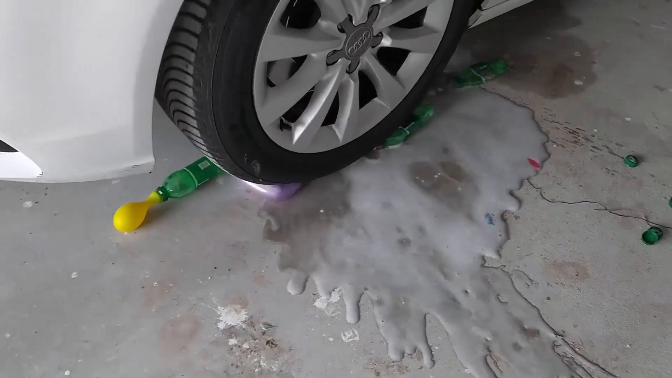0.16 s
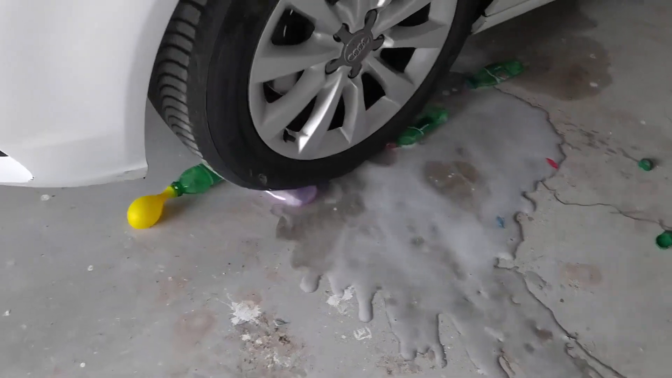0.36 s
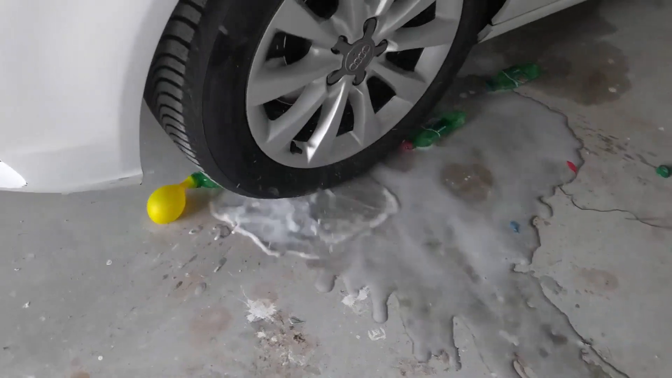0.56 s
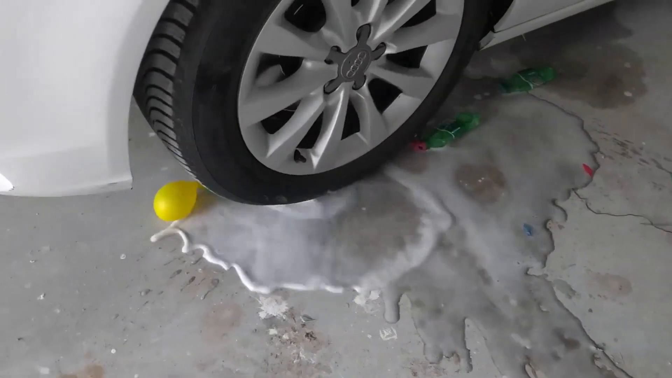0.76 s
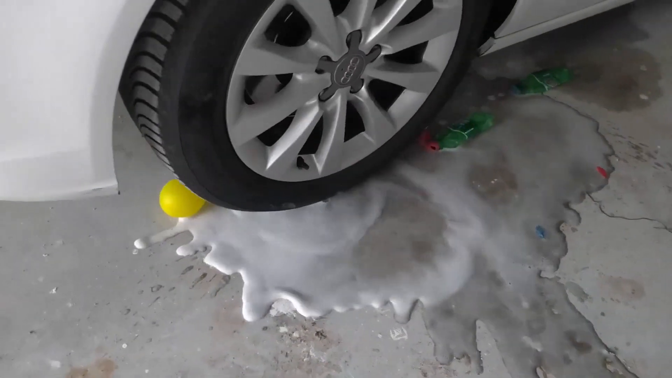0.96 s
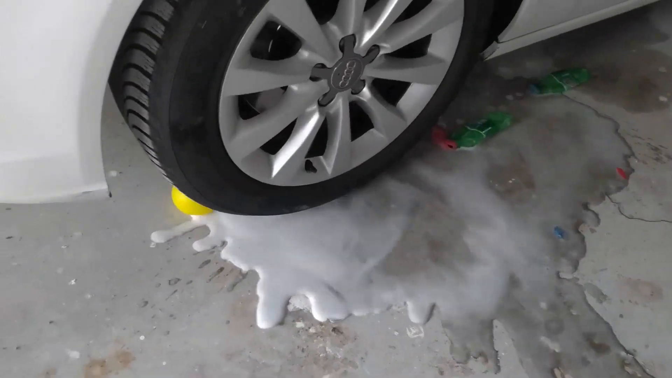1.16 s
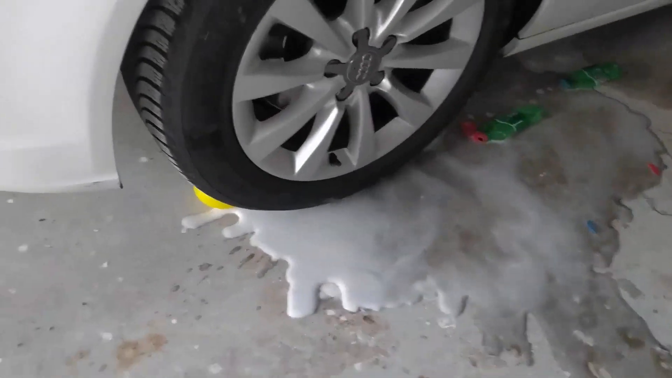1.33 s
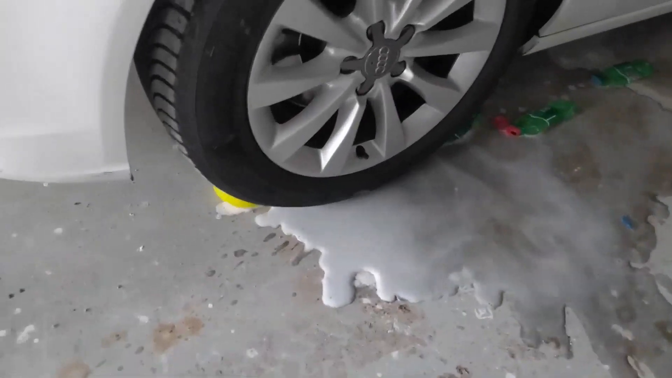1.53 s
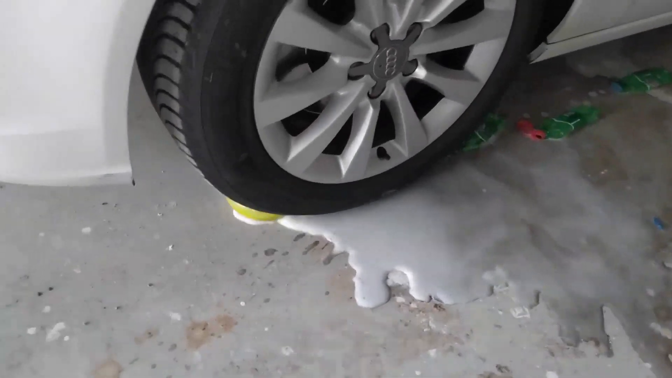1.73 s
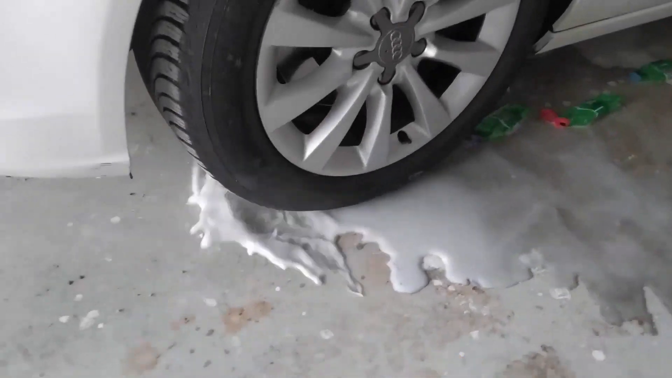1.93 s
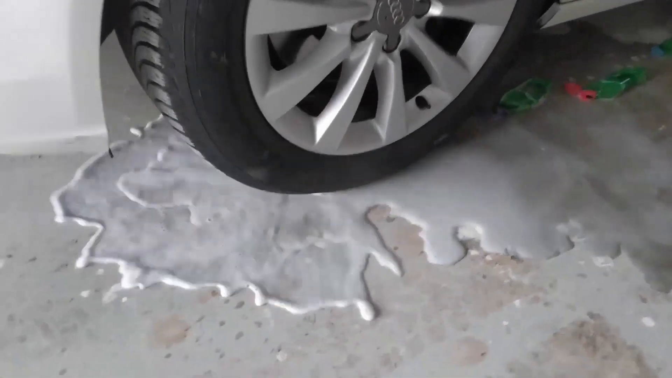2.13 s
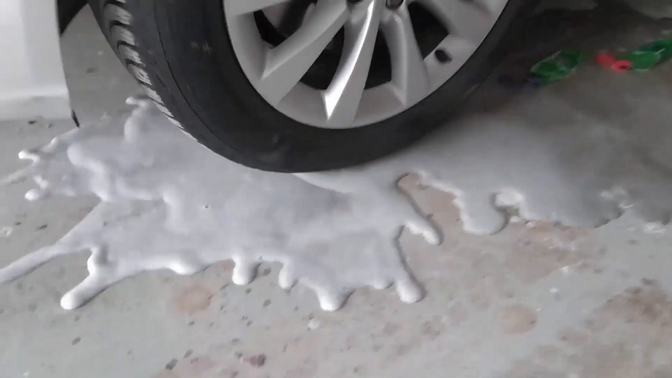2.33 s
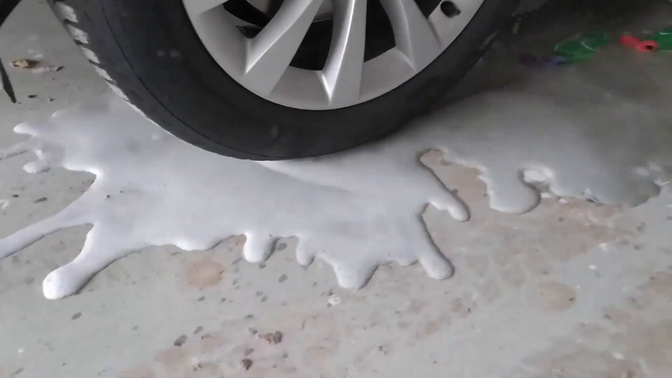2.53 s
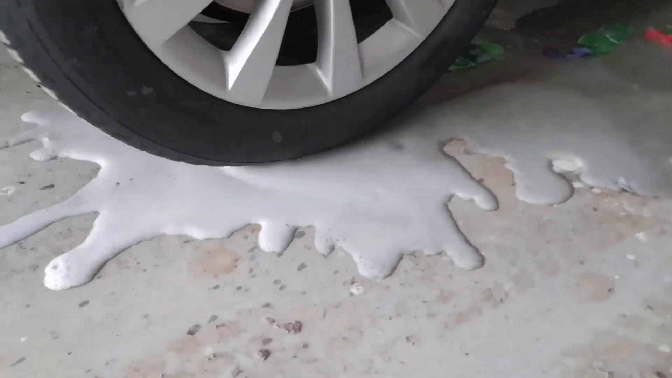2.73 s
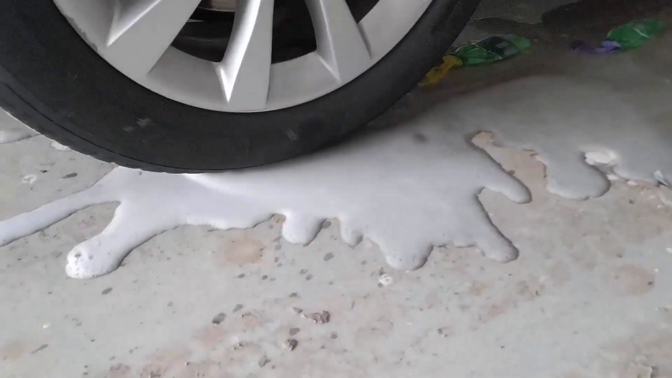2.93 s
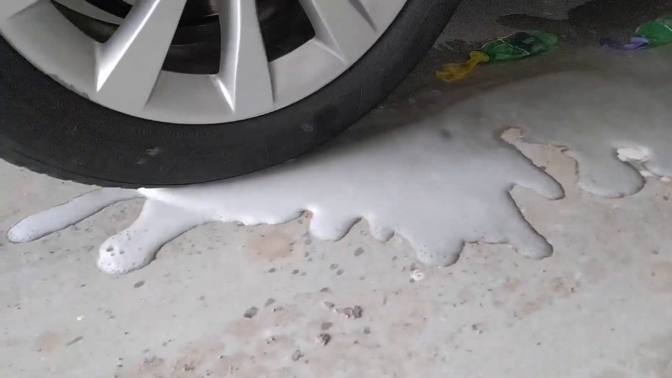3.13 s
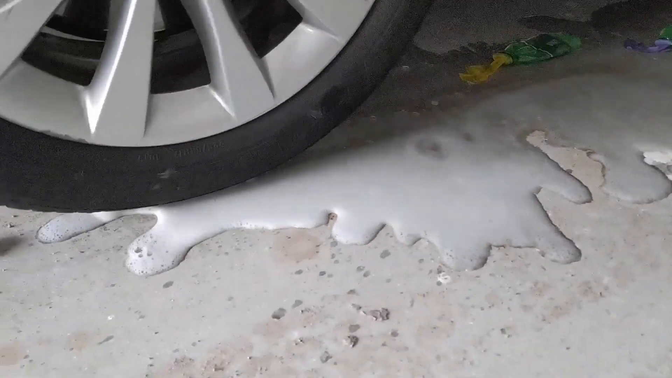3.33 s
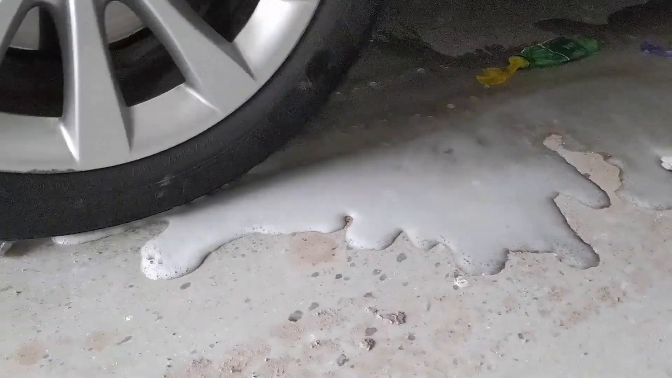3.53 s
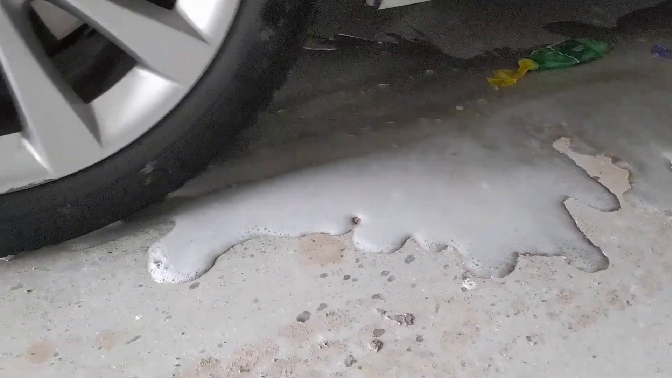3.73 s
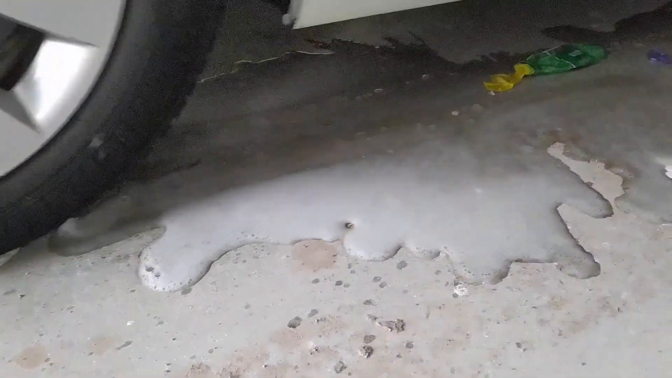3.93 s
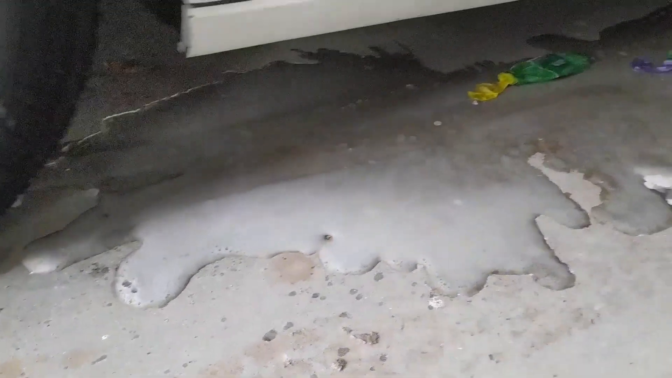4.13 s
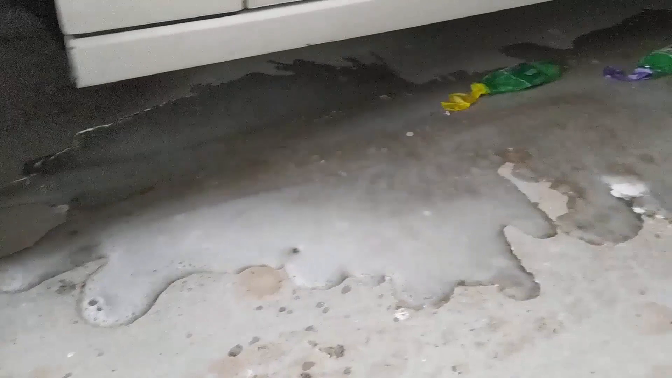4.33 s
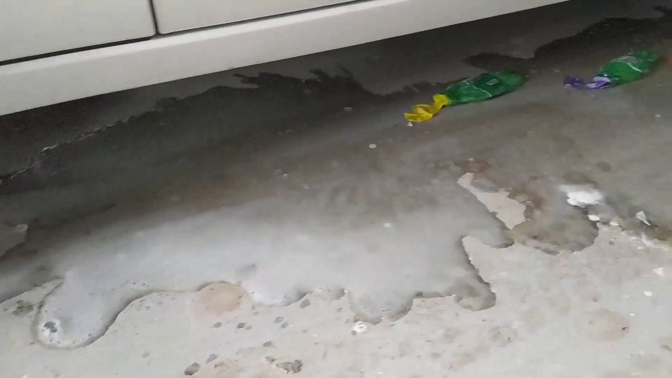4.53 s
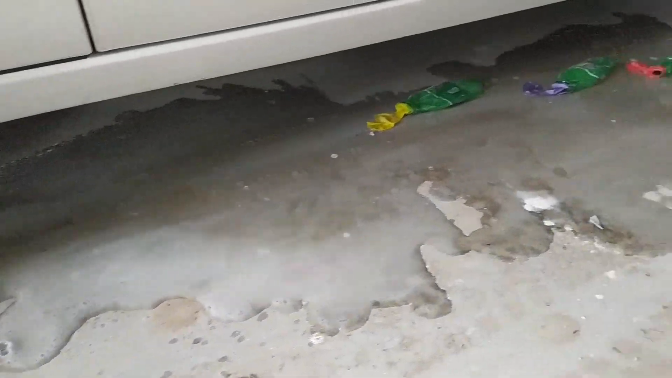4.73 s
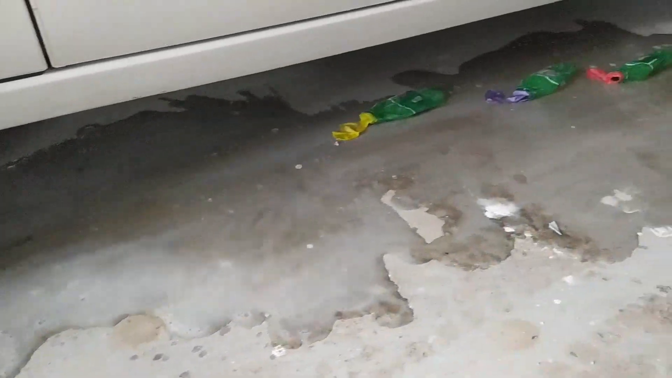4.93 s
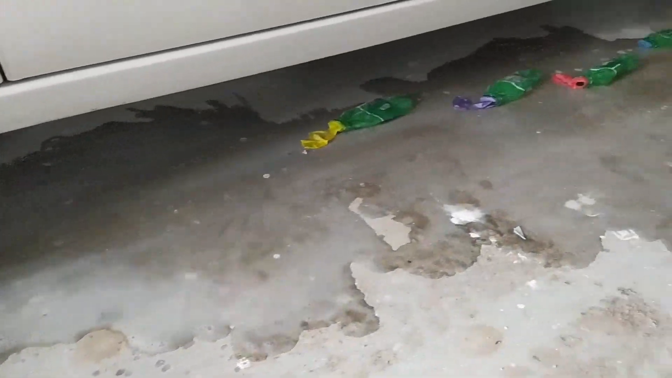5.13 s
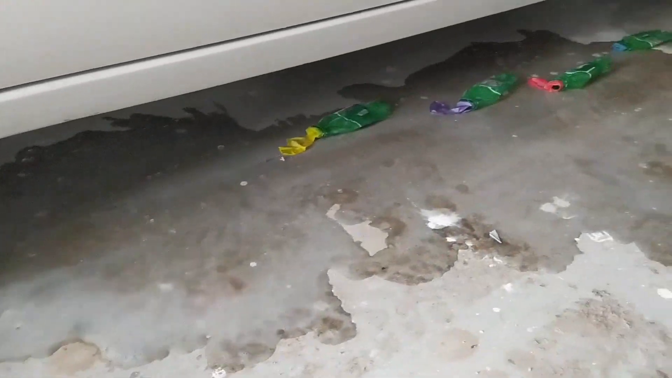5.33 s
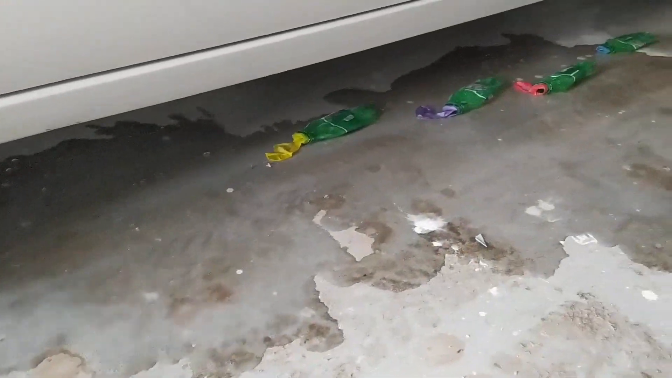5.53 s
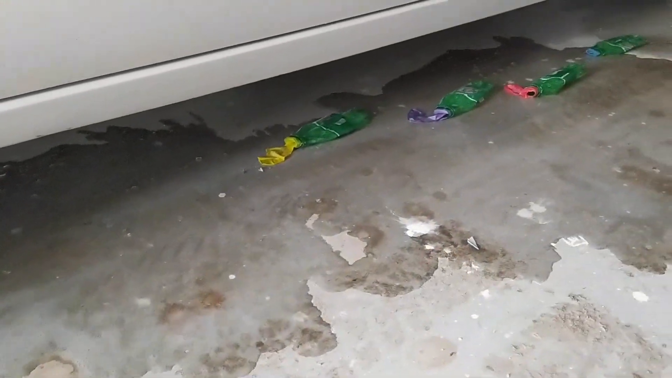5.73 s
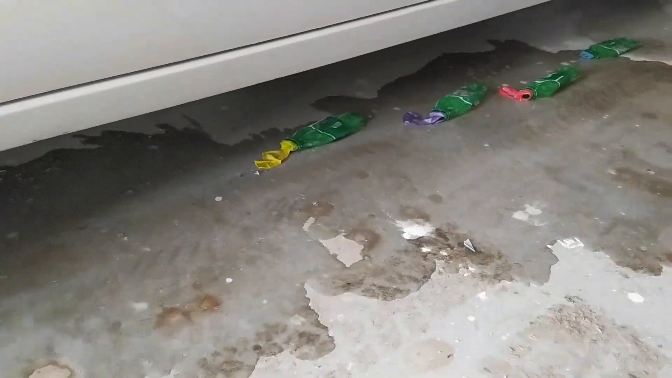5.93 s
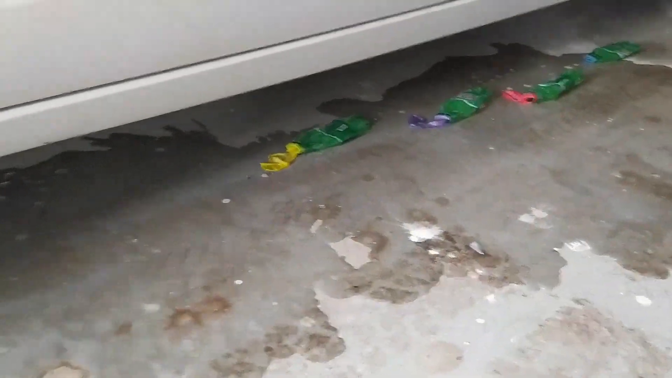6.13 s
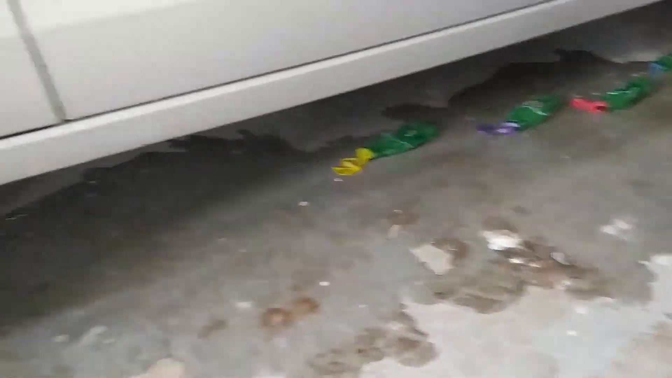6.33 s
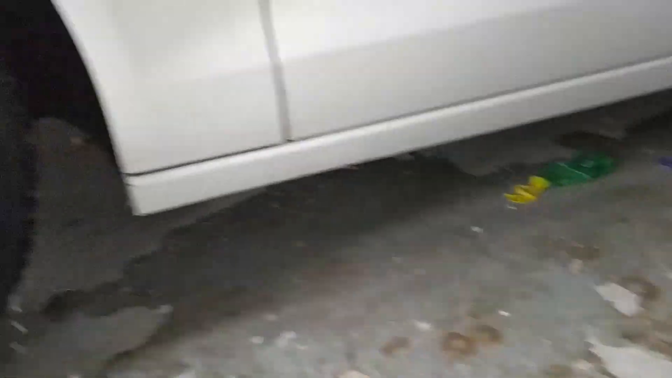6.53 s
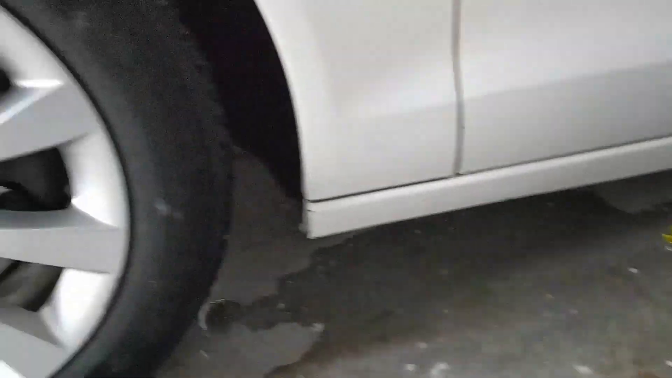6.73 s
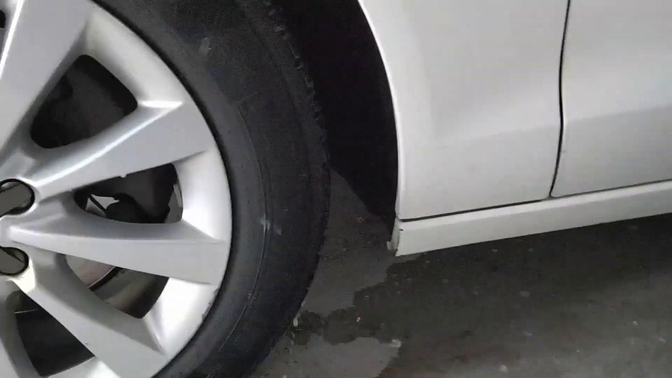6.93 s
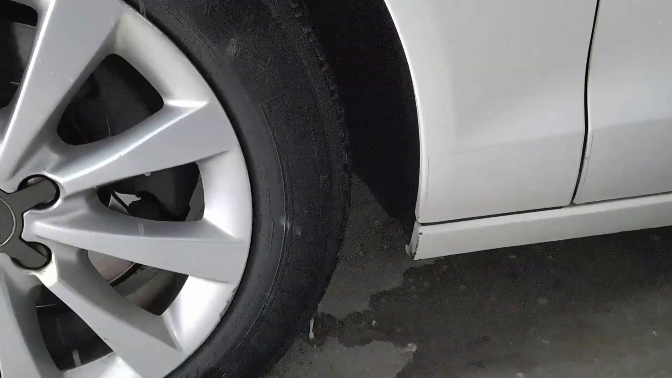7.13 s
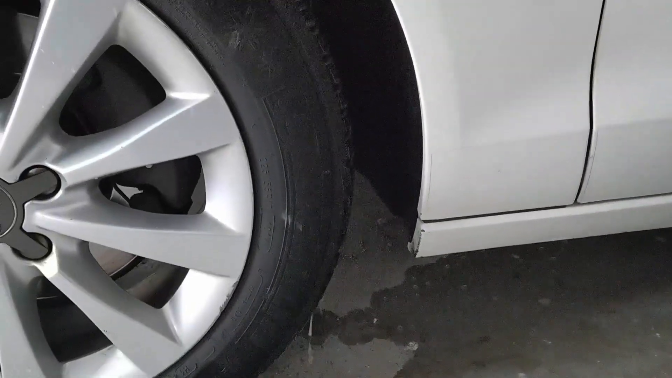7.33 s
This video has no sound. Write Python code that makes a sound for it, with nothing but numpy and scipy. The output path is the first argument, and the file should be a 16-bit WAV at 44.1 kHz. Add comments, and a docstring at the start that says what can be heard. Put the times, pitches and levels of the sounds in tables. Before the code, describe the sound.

In a concrete garage, the echo of an earlier bang fades as a car tyre rolls slowly over plastic bottles close to the microphone. The plastic crackles, then a bottle bursts with a loud, ringing bang and squirts foam. More crackling leads to a second bang and a wet splatter. Afterwards foam fizzes softly while the wet tyre rolls on with small gritty pops over a faint engine idle.

```python
"""First comes the hanging echo of a bang in a concrete garage, heard from a camera's two spaced microphones.
Close by, a car rolls slowly over plastic bottles of foam, capped with balloons. They crackle as they
buckle, and two burst with a bang that ducks the camera's gain; the echo swells back as the gain recovers.
Foam squirts out and fizzes on the floor while the wet tyre and the idling car move on."""
import sys
import numpy as np
from scipy import signal
from scipy.fft import rfft, irfft, next_fast_len
from scipy.io import wavfile
from scipy.ndimage import uniform_filter1d, map_coordinates

SR = 44100
rng = np.random.default_rng(int(sys.argv[2]) if len(sys.argv) > 2 else 0)


def inscribe(sig):
    """Save sig as 16-bit PCM at rate SR to the path in sys.argv[1].

    A 1-D sig is mono; a 2-D sig holds one channel per row.
    Samples are clipped to [-1, 1] before scaling.
    """
    pcm = np.round(np.clip(np.atleast_2d(sig).T, -1, 1) * 32767)
    wavfile.write(sys.argv[1], SR, pcm.astype(np.int16))


N = 329427

# Bottles bursting; of the first, only the echo is heard. Each row: start in seconds, levels of crack,
# slap, air push and echo in dB, pitch of the bottle's hollow in Hz, its boost in dB.
BOTTLE_BURSTS = [(-0.74, -4, -10, -20, -5.5, 380, 5), (0.6102, 0, -7, -17, -6.5, 1470, 8),
                 (1.9942, -1, -13.5, -17.5, -6, 500, 0.5)]
# The garage's decay. Each row: frequency in Hz, seconds to fall by 60 dB.
GARAGE_T60 = [(60, 2.2), (250, 2.055), (600, 1.77), (1000, 1.364), (2000, 1.58), (4000, 1.22), (9000, .6)]
# How strongly the tyre rolls. Each row: time in seconds, level in dB.
ROLL_LEVEL = [(3.5, 0.5), (4.55, 1), (5.7, -10), (6.6, -10.5), (7.47, -13)]
# Plastic buckling under the tyre. Each row: start in seconds, knock in Hz, knock in dB, crack in dB.
BUCKLES = [(0.015, 1240, -28, -45), (0.256, 1556, -24, -43.5), (0.424, 1120, -30, -33.5),
           (0.461, 970, -30, -31), (0.471, 3700, -20.5, -25), (0.506, 530, -21, -21.5),
           (1.135, 2180, -25, -24.5), (1.214, 905, -34.5, -30.5), (1.304, 905, -20, -42),
           (1.320, 1000, -25, -20.5), (1.336, 930, -19, -32), (1.361, 1190, -23.5, -20.5),
           (1.901, 1390, -23.5, -42), (2.368, 2310, -28, -22.5), (2.460, 3800, -21, -23.5),
           (3.208, 1430, -35.5, -44.5)]
# The modes of a bottle's wall. Each row: frequency in Hz, width in Hz, level in dB.
WALL_MODES = [(2290, 550, -0.5), (4500, 290, 0)]
# Hard bits under the tread. Each row: start in seconds, knock in dB, tick in dB.
CHIP_POPS = [(0.115, -44, -32), (0.369, -44, -28), (3.776, -28.5, -32.5), (3.817, -28, -39),
             (4.094, -29.5, -19.5), (4.165, -46, -35), (4.622, -48, -32), (4.999, -46, -38.5),
             (5.139, -46.5, -46.5), (7.087, -50.5, -60), (7.341, -62.5, -47)]
# Foam squirts as a bottle splits and again as it is flattened.
# Each row: time of full flow in seconds, hold in seconds, jet in dB, slop in dB.
FOAM_SQUIRTS = [(0.644, 0.088, -35, -39), (0.728, 0.016, -34, -23.5), (2.069, 0.09, -31.5, -30),
                (2.232, .03, -21, -23)]
# Creeping rubber. Each row: midpoint and length in seconds, resonance and its width in Hz, level in dB.
RUBBER_GROANS = [(3.763, .1, 394, 250, -49.5), (3.768, .22, 4830, 3000, -47), (3.963, 0.25, 302, 45, -54.5),
                 (3.99, 0.1, 156, 30, -51.5), (4.52, 0.27, 300, 500, -53), (4.655, 0.47, 159, 34.7, -58),
                 (4.652, 0.71, 89.3, 40, -59.5), (6.901, 0.63, 290, 111, -62.5),
                 (6.855, 0.43, 1870, 1300, -59.5)]

# Tone colours at the microphones. Each row: frequency in Hz, level in dB.
RIP_SPECTRUM = [(60, -26.5), (250, -8), (700, 1), (1200, 0), (1700, -9), (2600, -8.5), (3500, -22),
                (4400, -14), (5600, -20.5), (8500, -12), (11500, -25.5), (16000, -32.5)]  # a bottle bursting
ECHO_SPECTRUM = [(30, -23.5), (60, -29), (110, -28), (160, -19.5), (230, -8.5), (310, -11), (480, -3),
                 (780, 2), (1050, -4.5), (1450, -15), (2100, -12.5), (3200, -27.5), (4400, -24),
                 (6000, -26), (8500, -17.5), (12000, -36)]  # the garage's answer to it
FIZZ_SPECTRUM = [(1470, -43.5), (2500, -15.5), (3360, -12.5), (4210, -8), (5230, -13.5), (6150, -5),
                 (6860, -6.5), (8460, 2.5), (10000, -2), (11400, -14), (13900, -14.5), (15200, -21),
                 (16000, -23)]  # bubbles on the floor
RUMBLE_SPECTRUM = [(53, -29.5), (90, -7), (118, -5.5), (156, 2), (201, -3.5), (303, 1), (341, -3.5),
                   (515, -2.5), (668, -8), (804, -5.5), (1200, -11), (1560, -38.5), (2640, -120)]  # the tyre's body
GRIT_SPECTRUM = [(400, -25.5), (800, -5), (1300, -1.5), (2200, 3), (3000, -5), (4500, -25.5)]  # grit ground on concrete
TREAD_SPECTRUM = [(2500, -25.5), (4200, -0.5), (6000, 0), (8000, -22)]  # wet tread peeling off the floor
IDLE_SPECTRUM = [(12, -27), (20, -1.5), (39, -1.5), (54, -13.5), (87, -3.5), (108, -18.5), (140, -24.5),
                 (180, -46.5), (310, -120)]  # the engine
TICK_SPECTRUM = [(2500, -15), (5000, -9), (7000, -2), (8500, 3.5), (10000, -1), (11500, -16.5),
                 (16000, -20)]  # the bright edge of a snap
JET_SPECTRUM = [(800, -17.5), (2200, 4), (4500, -0.5), (6500, -4), (8500, 2), (10000, -7), (11500, -17.5),
                (16000, -16.5)]  # spraying foam
SLOP_SPECTRUM = [(40, -24), (120, -17), (220, -7.5), (320, -6.5), (540, 1), (850, -3), (1400, -17),
                 (2200, -15), (4000, -35.5), (8000, -60.5)]  # foam landing


def amp(db):
    """Decibels to gain."""
    return 10 ** (np.asarray(db) / 20)


def unit(x):
    """x at rms 1."""
    return x / np.sqrt(np.mean(x ** 2) + 1e-20)


def along(points, hz):
    """Read between (Hz, value) points on a log frequency axis."""
    f, v = np.transpose(points)
    return np.interp(np.log(hz + 1), np.log(f + 1), v)


def colour(points):
    """The gain of a (Hz, dB) spectrum as a function of frequency."""
    return lambda hz: amp(along(points, hz))


def resonances(modes):
    """The response of (Hz, width, dB) modes as a function of frequency."""
    return lambda f: sum((-1) ** k * amp(db) * 1j * f * width / (hz * hz - f * f + 1j * f * width)
                         for k, (hz, width, db) in enumerate(modes))


def wobble(rate):
    """A smooth random curve, rate knots a second."""
    return map_coordinates(rng.standard_normal(int(N * rate / SR) + 4), [np.arange(N) * rate / SR])


def swell(t, peak_s):
    """A smooth bump that reaches 1 after peak_s."""
    return (t / peak_s * np.exp(1 - t / peak_s)) ** 2


def filtered(x, response):
    """x through a frequency response."""
    n = x.shape[-1]
    padded = next_fast_len(n + 4096, True)
    return irfft(rfft(x, padded) * response(np.fft.rfftfreq(padded, 1 / SR)), padded)[..., :n]


def spaced_mics(pair, response, unrelated_hz=1420):
    """Two unrelated signals become a diffuse field of rms 1, alike at both microphones in the bass."""
    alike = lambda hz: .9 * np.sinc(hz / unrelated_hz) / (1 + (hz / unrelated_hz / 2) ** 2)
    mid, side = filtered(pair, lambda hz: response(hz) * np.sqrt([1 + alike(hz), 1 - alike(hz)]))
    return unit(np.array([mid + side, mid - side]))


def noise(response, size=N):
    """Coloured stereo noise of rms 1."""
    return spaced_mics(rng.standard_normal((2, size)), response)


def grains(spectrum, rate, spread_db):
    """Tiny clicks of scattered sizes, rate a second, at rms 1."""
    clicks = (rng.random((2, N)) < rate / SR) * rng.choice([-1, 1], (2, N))
    sizes = amp(spread_db * np.minimum(rng.standard_normal((2, N)), 3))
    return spaced_mics(clicks * sizes, colour(spectrum))


def add(out, s, sound):
    """Mix a sound in from time s, which may lie before the start."""
    i = round(s * SR)
    part = sound[:, max(-i, 0):N - i]
    out[:, max(i, 0):max(i, 0) + part.shape[1]] += part


def garage_decay(x):
    """Between the concrete walls each frequency fades at its own speed, in clumps of reflections."""
    hz, t, spectrum = signal.stft(x, SR, nperseg=512)
    speckle = rng.standard_normal(spectrum.shape[1:])
    clumps = unit(uniform_filter1d(uniform_filter1d(speckle, size=3, axis=0), size=3, axis=1))
    depth_db = along([(300, .5), (1200, 2.2)], hz)[:, None]
    fallen_db = 60 * t / along(GARAGE_T60, hz)[:, None]
    return signal.istft(spectrum * amp(depth_db * clumps - fallen_db), SR, nperseg=512)[1]


def bursts(rise_s=0.0014, crack_t60=0.052, slap_s=0.0071, early_db=-13, early_t60=0.36,
           push_s=0.0055, recoil_s=.02, build_s=0.016):
    """A rip and a push of air reach the microphones, then a slap off the car body, then the long echo."""
    out, t = np.zeros((2, N)), np.arange(3 * SR) / SR
    for s, crack_db, slap_db, push_db, echo_db, hollow_hz, hollow_db in BOTTLE_BURSTS:
        slap = amp(slap_db) * swell(np.maximum(t - slap_s, 0), peak_s=0.0011)
        fade = amp(-60 * t / crack_t60) + slap + amp(early_db - 60 * t / early_t60)
        rip = noise(colour(RIP_SPECTRUM), size=len(t)) * fade * (1 - np.exp(-t / rise_s))
        rip /= np.sqrt(np.mean(rip[:, :SR // 100] ** 2))  # rms 1 over the first 10 ms
        # the pressure rises, then sucks back more slowly
        suction = 1.6 * swell(np.maximum(t - push_s, 0), push_s) + 0.37 * swell(t, recoil_s)
        push = 0.79 * swell(t, push_s) - suction
        hollow = lambda hz: amp(hollow_db * np.exp(-(np.log2((hz + 1) / hollow_hz) / 0.49) ** 2))
        walls = noise(lambda hz: colour(ECHO_SPECTRUM)(hz) * hollow(hz), size=len(t))
        echo = garage_decay(walls)[:, :len(t)] * (1 - np.exp(-t / build_s))
        add(out, s, amp(crack_db) * rip + amp(push_db) * push + amp(echo_db) * echo)
    return out


def fizz(level_db=-40, fresh_db=2.5, fresh_s=.5, fade_s=4.28, fade_db_per_s=4.5):
    """Countless bubbles pop on the floor: louder while fresh from a burst, fading away from about 4.3 s on."""
    t = np.arange(N) / SR
    fresh = sum((t > s) * np.exp(-np.abs(t - s) / fresh_s) for s, *_ in BOTTLE_BURSTS)
    fizz_db = level_db + fresh_db * fresh - fade_db_per_s * np.maximum(t - fade_s, 0)
    return amp(fizz_db + .3 * wobble(6.8)) * grains(FIZZ_SPECTRUM, rate=7000, spread_db=-0.5)


def car(rumble_db=-55, grit_db=-53.5, tread_db=-52, idle_db=-61, dry_s=6.3, dry_db_per_s=9.5):
    """The tyre rumbles, grinds grit and peels off the wet floor over the low idle of the engine."""
    t = np.arange(N) / SR
    roll_db = np.interp(t, *np.transpose(ROLL_LEVEL))
    dried_db = dry_db_per_s * np.maximum(t - dry_s, 0)  # the tread leaves the puddle
    rumble = amp(rumble_db + roll_db + 1.2 * wobble(11)) * noise(colour(RUMBLE_SPECTRUM))
    grit = amp(grit_db + roll_db + 1.1 * wobble(18)) * grains(GRIT_SPECTRUM, rate=1000, spread_db=1)
    wet_hiss = amp(tread_db + .6 * roll_db - dried_db) * grains(TREAD_SPECTRUM, rate=3000, spread_db=6)
    idle = amp(idle_db) * noise(colour(IDLE_SPECTRUM))
    return rumble + grit + wet_hiss + idle


def snap(hz, knock_db, crack_db, tick_db, scatter_t60, knock_width=1.04, peak_s=0.0019, scatter_db=-8):
    """One snap knocks the hollow plastic, rings its wall and ticks; floor and wheel arch scatter it."""
    t = np.arange(SR // 5) / SR
    scatter = amp(scatter_db - 60 * t / scatter_t60) * (1 - np.exp(-t / peak_s))
    hollow = resonances([(hz, knock_width * hz, 0)])
    ring = .6 * np.sin(2 * np.pi * hz * t + rng.normal(0, .6, (2, 1))) * swell(t, 2 / hz)
    body = noise(lambda f: hollow(f) ** 2, size=len(t))
    knock = ring + np.hypot(0.55 * swell(t, .0035), scatter) * body
    crack = noise(lambda f: resonances(WALL_MODES)(f) / (1 + (f / 7000) ** 4), size=len(t))
    tick = noise(colour(TICK_SPECTRUM), size=len(t))
    spike = 1.3 * swell(t, peak_s) ** 4
    edge = (amp(crack_db) * crack + amp(tick_db) * tick) * np.hypot(spike, scatter)
    return amp(knock_db) * knock + edge


def buckles():
    """Down at the tyre, the bottles buckle one crease at a time."""
    out = np.zeros((2, N))
    for s, hz, knock_db, crack_db in BUCKLES:
        add(out, s, snap(hz, knock_db, crack_db, tick_db=crack_db - 1.5, scatter_t60=.12))
    return out


def garage_echo(x):
    """The small sounds come back from the walls farther off, their treble dulled."""
    walls = colour([(200, 1.0), (1200, -4), (2500, -3.0), (5000, -6.0), (12000, -11)])
    tail = garage_decay(noise(walls, size=2 * SR))
    return signal.fftconvolve(x, tail / np.linalg.norm(tail[0]), axes=1)[:, :N]


def chips(count=32, strays_per_s=3, stray_knock_db=-48, stray_tick_db=-42, spread_db=2.5, knock_hz=950):
    """Hard bits pop from under the tread: a few loud ones, and faint strays that follow the rolling."""
    out, chance = np.zeros((2, N)), rng.random((count, 2))
    times = (np.arange(count) + chance[:, 0]) / strays_per_s
    sizes_db = np.interp(times, *np.transpose(ROLL_LEVEL)) + spread_db * (2 * chance[:, 1] - 1)
    strays = [(s, stray_knock_db + db, stray_tick_db + db)
              for s, db in zip(times, sizes_db) if s < N / SR]
    for s, knock_db, tick_db in list(CHIP_POPS) + strays:
        add(out, s, snap(knock_hz, knock_db, crack_db=tick_db - 14, tick_db=tick_db, scatter_t60=0.17))
    return out


def squirt_gain(s, hold_s, fall_db_per_s, rise_db_per_s=400):
    """A squirt's flow rises to 1 at time s, holds, then falls."""
    t = np.arange(N) / SR
    return amp(-rise_db_per_s * np.maximum(s - t, 0) - fall_db_per_s * np.maximum(t - s - hold_s, 0))


def squirts(slop_stretch=1.66, echo_db=-12):
    """Foam sprays from the split bottles with a spatter of drops, and slops down for a little longer."""
    jet = sum(amp(db) * squirt_gain(s, hold_s, fall_db_per_s=520) for s, hold_s, db, _ in FOAM_SQUIRTS)
    spill = sum(amp(db) * squirt_gain(s, hold_s * slop_stretch, fall_db_per_s=85)
                for s, hold_s, _, db in FOAM_SQUIRTS)
    drops = grains(JET_SPECTRUM, rate=700, spread_db=4.5)
    spray = jet * (.68 * noise(colour(JET_SPECTRUM)) + .6 * drops)
    slop = spill * grains(SLOP_SPECTRUM, rate=900, spread_db=3)
    return spray + amp(echo_db) * garage_echo(spray) + slop


def groans():
    """Rubber groans and scuffs in swells as it creeps over the concrete."""
    out, t = np.zeros((2, N)), np.arange(N) / SR
    for s, length_s, hz, width_hz, db in RUBBER_GROANS:
        rubber = resonances([(hz, width_hz, 0)])
        rub = np.exp(-(2 * (t - s) / length_s) ** 4)
        out += amp(db) * rub * noise(lambda f: rubber(f) ** 2)
    return out


def scene():
    """Bottles, foam and car in the garage, from where the camera stands."""
    bangs_foam_and_car = bursts() + squirts() + fizz() + car() + groans()
    crackle = buckles() + chips()
    return bangs_foam_and_car + crackle + amp(-9) * garage_echo(crackle)


def record(dry, limit_db=-12.0, release_db_per_s=62, top_hz=16000):
    """The camera's gain drops at once on a loud sound and climbs back steadily; peaks clip softly."""
    power = np.abs(uniform_filter1d(np.mean(dry ** 2, axis=0), size=441))  # over 10 ms
    excess_db = np.maximum(10 * np.log10(power + 1e-12) - limit_db, 0)
    climb_db = release_db_per_s * np.arange(N) / SR
    ducked = dry * amp(climb_db - np.maximum.accumulate(excess_db + climb_db))
    clipped = ducked / (1 + np.abs(ducked) ** 6) ** (1 / 6)
    return filtered(clipped, lambda hz: hz < top_hz)


dry = scene()
out = record(dry)
inscribe(out)
```